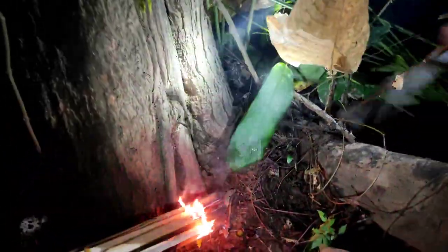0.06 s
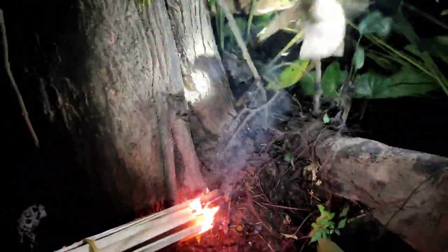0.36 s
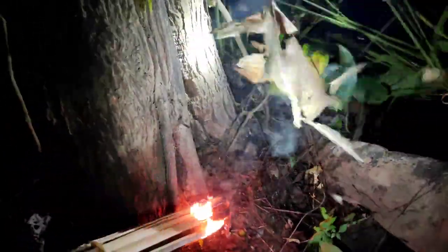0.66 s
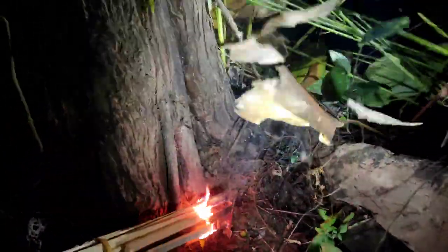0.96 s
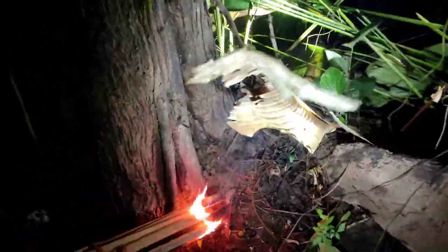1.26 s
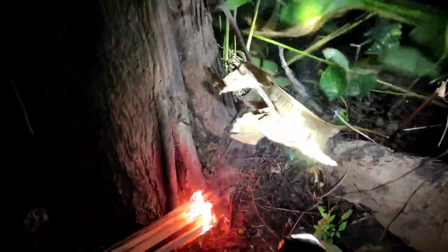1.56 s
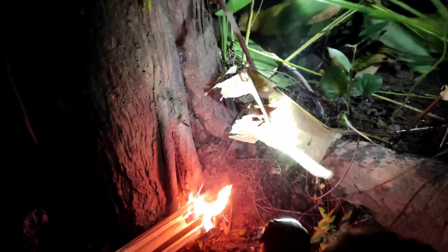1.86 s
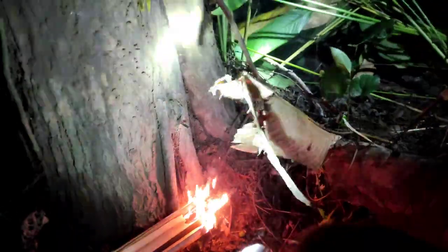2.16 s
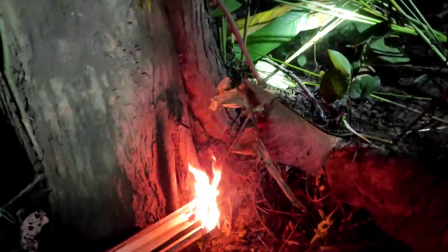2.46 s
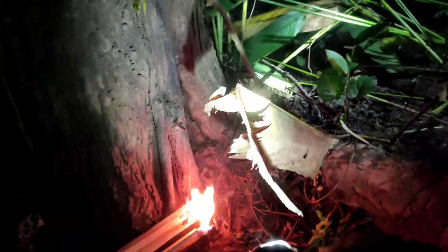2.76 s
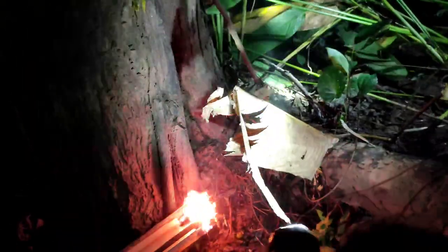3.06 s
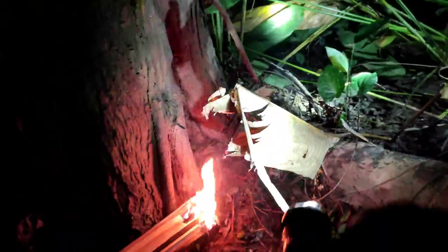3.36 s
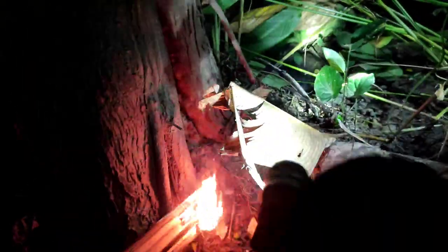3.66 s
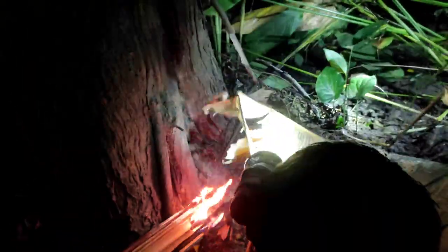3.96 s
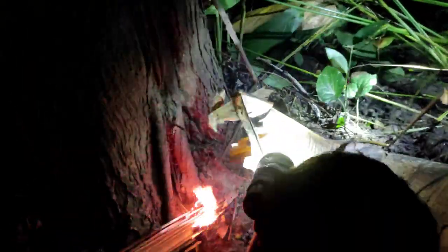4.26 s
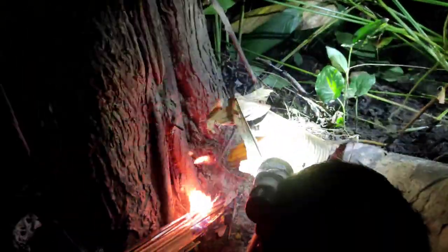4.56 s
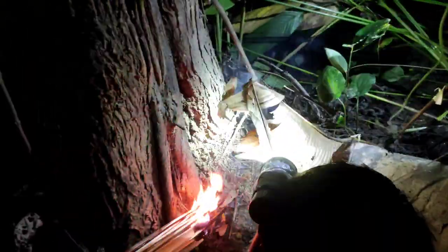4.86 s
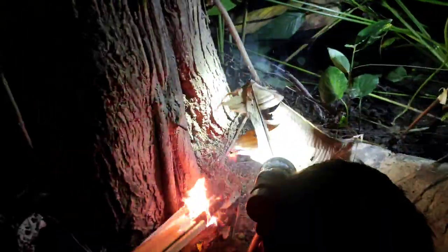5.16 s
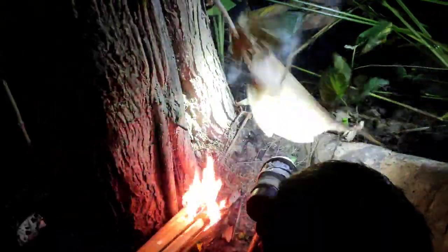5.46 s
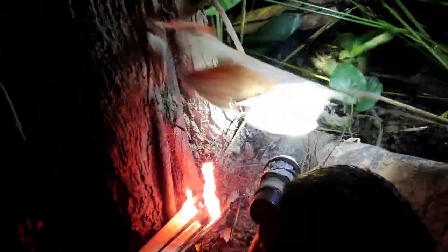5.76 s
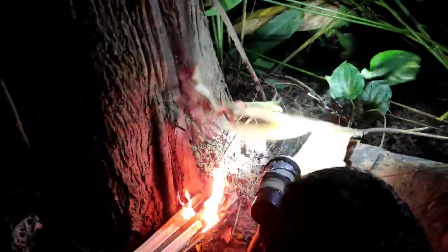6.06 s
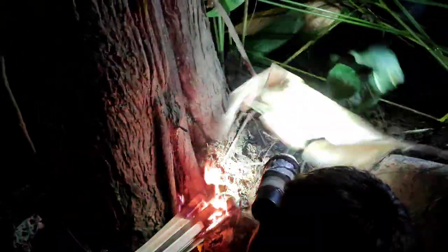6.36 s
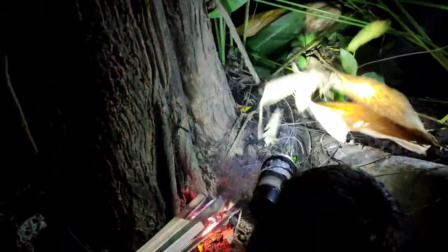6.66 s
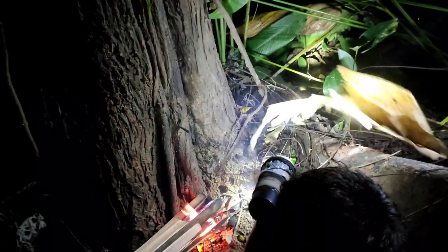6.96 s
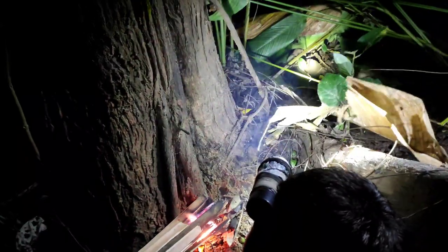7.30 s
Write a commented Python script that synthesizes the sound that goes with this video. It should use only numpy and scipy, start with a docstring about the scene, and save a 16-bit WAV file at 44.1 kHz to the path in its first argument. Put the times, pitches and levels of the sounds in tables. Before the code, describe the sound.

Close, irregular snaps and crunches of undergrowth being pulled, over leaf rustle, faint torch ticks and soft night insects.

```python
"""Dry cracks and rustling: leaves and stems are tugged, crushed and snapped in the undergrowth at night.
Each crack is an avalanche of tiny fibre fractures; the hardest also ring the modes of a hollow stem.
Each tug sets the leaves rustling until they settle, with dull thuds and rubbing in the litter.
A burning bamboo torch ticks faintly and a cricket pulses, over a distant insect chorus,
a brief faint hum and a low rumble of air."""
import sys
import numpy as np
from scipy import signal
from scipy.fft import rfft, irfft, next_fast_len
from scipy.io import wavfile

SR = 44100
rng = np.random.default_rng(int(sys.argv[2]) if len(sys.argv) > 2 else 0)


def dump(signal):
    """Clip the signal to [-1, 1] and save it as 16-bit WAV at the path in sys.argv[1]."""
    limited = np.clip(np.atleast_2d(signal).T, -1, 1)
    pcm = np.round(limited * 32767).astype(np.int16)
    wavfile.write(sys.argv[1], SR, pcm)


N = 327663
TIME = np.arange(N) / SR


# spectrum of dry leaf and fibre: (frequency [Hz], relative level [dB])
FIBRE_SPECTRUM = [(30, -1), (70, 2), (250, -1), (700, 0), (1200, -0.5), (1900, -2), (2800, -2), (4000, -6),
                  (5600, -10), (8000, -12.5), (10000, -15), (14000, -13)]
# how each material breaks: name -> (rise time [s], body gain [dB], treble gain [dB])
MATERIALS = {"twig": (0.0015, -13, -19.5), "stalk": (0.00085, -2, -3.5), "stem": (.003, 6.7, -0.95),
             "husk": (0.0057, 0.69, 6.2), "leaf": (0.011, 2.3, 12.6), "bamboo": (0.0014, -6, 19.7)}
# cracks and crunches: (time [s], level [dB], decay t60 [s], material)
CRACKS = [ (0.131, -48, 0.25, "stalk"), (.235, -42, 0.11, "stem"), (0.31, -24.5, 0.038, "twig"),
          (.318, -33.5, 0.71, "husk"), (.369, -24, 0.25, "stalk"), (.599, -34, 0.044, "twig"),
          (.687, -33, 0.2, "stem"), (.850, -41, 0.046, "stem"), (1.359, -47, 0.017, "stalk"),
          (1.531, -34.5, 0.76, "husk"), (1.559, -25.5, 0.5, "husk"), (1.572, -17.5, 0.27, "twig"),
          (1.596, -27.5, 0.59, "husk"), (1.910, -40.5, 0.029, "twig"), (1.971, -40, 0.055, "twig"),
          (2.212, -41, .068, "twig"), (2.339, -47.5, 0.07, "bamboo"), (2.720, -28.5, 0.26, "leaf"),
          (2.742, -23.5, 0.15, "leaf"), (2.807, -27.5, 0.069, "twig"), (3.123, -48.5, 0.034, "bamboo"),
          (3.225, -52, 0.051, "twig"), (3.278, -32.5, 0.031, "twig"), (3.325, -35, 0.35, "husk"),
          (3.332, -27, 0.049, "leaf"), (3.85, -29, .06, "twig"), (3.855, -14, 0.17, "stem"),
          (3.876, -14, 0.16, "stem"), (3.899, -26, 0.17, "husk"), (3.955, -30, 0.2, "stem"),
          (4.008, -30, 0.035, "twig"), (4.111, -29.5, 0.072, "twig"), (4.417, -29.5, .11, "stem"),
          (4.4308, -15, 0.16, "stem"), (4.456, -27, 0.29, "stalk"), (4.661, -35, 0.029, "twig"),
          (5.273, -41, 0.06, "husk"), (5.488, -43, 0.6, "stem"), (5.556, -40, 0.045, "bamboo"),
          (5.629, -36, 0.051, "bamboo"), (5.850, -29.5, .071, "stalk"), (5.898, -23.5, 0.075, "bamboo"),
          (5.953, -32, 0.1, "husk"), (6.104, -37, 0.12, "stem"), (6.409, -28, 0.33, "husk"),
          (6.427, -11.5, 0.062, "husk"), (6.441, -32, 0.13, "leaf"), (6.471, -26, 0.059, "stalk"),
          (7.007, -24, .16, "husk"), (7.023, -30.5, 0.12, "stalk"), (7.315, -47, 0.027, "twig")]
def cracks(splinter_db=-9):
    """Brittle fracture: fibres fail in an avalanche; thick stems add body, thin leaf adds treble."""
    out, t = np.zeros((2, N)), np.arange(SR // 2) / SR
    for start, db, t60, material in CRACKS:
        rise, body_db, treble_db = MATERIALS[material]
        swell = np.minimum(t / rise, 1) * decay(t, t60, hold=rise)
        tilt_db = lambda hz: body_db * (1 - shelf(hz, 1570)) + treble_db * shelf(hz, 3320)
        grains = fractures(len(t), spread_db=0.5)
        grains += undb(splinter_db) * splinters(len(t), count=260, spread_db=3.0)
        burst = colour(grains * swell, lambda hz: undb(along(FIBRE_SPECTRUM, hz) + tilt_db(hz)))
        add(out, unit(burst) * rms(swell) * undb(db), start)
    return out


def fractures(n, spread_db, size=24):
    """Acoustic emission: a dense run of half-millisecond noise snaps, each of random strength."""
    strength = undb(spread_db * np.minimum(rng.exponential(size=n // size + 1), 5))
    return unit(rng.standard_normal((2, n)) * np.repeat(strength, size)[:n])


def splinters(n, count, spread_db, low_hz=300, high_hz=3500, cycles=1.72, size=1024):
    """Damped free vibration: twigs and ribs each ring for a few cycles at a pitch of their own."""
    when, pitch, luck, *phases = rng.random((count, 5)).T[:, :, None]
    hz = low_hz + (high_hz - low_hz) * pitch ** 2
    strength = hz ** 1.08 * undb(spread_db * np.minimum(-np.log(1 - luck), 4))
    age = hz * np.arange(size) / SR  # in cycles
    envelope = np.exp(-age / cycles) * (1 - np.exp(-2 * age))
    rings = strength * np.sin(2 * np.pi * (age + np.array(phases))) * envelope
    where = ((when * n).astype(int) + np.arange(size)).ravel()
    return unit(np.array([np.bincount(where, ring.ravel(), n)[:n] for ring in rings]))


# modes of a hollow stem: (frequency [Hz], relative level [dB], decay t60 [s])
STEM_MODES = [(226, -25, 0.042), (520, -53, 0.063), (742, 5, 0.026), (980, 15, 0.0098), (1087, -5.5, 0.065),
              (1410, 5.5, 0.014)]
# blows on the stem: (time [s], peak level [dB], pitch ratio, delay of right channel [ms])
KNOCKS = [(3.8569, -12.5, 1.19, 0), (3.8580, -5.5, 1.08, 0), (3.8790, -8.5, 0.84, 0),
          (4.4304, -4.5, 0.98, 0.27), (4.4370, -3, 1.03, 0.22), (4.4591, -13, 0.94, 0),
          (6.4309, -13, 0.89, -0.11), (7.0087, -15, 1.17, -0.23), (7.0128, -11.5, 1.08, -0.29)]
def knocks(contact_s=0.00048):
    """Modal resonance: a blow rings the stem's damped modes, at a pitch set by where it lands."""
    out, t = np.zeros((2, N)), np.arange(SR // 8) / SR
    for start, db, ratio, lag_ms in KNOCKS:
        delay_s = np.maximum([[-lag_ms], [lag_ms]], 0) / 1000
        age = np.maximum(t - delay_s, 0)
        ring = sum(undb(mode_db) * np.sin(2 * np.pi * hz * ratio * age) * decay(age, t60)
                   for hz, mode_db, t60 in STEM_MODES)
        ring *= 1 - np.exp(-age / contact_s)  # the fibrous skin yields first
        add(out, ring / np.abs(ring).max() * undb(db), start)
    return out


# soft blows on soil and litter: (time [s], level [dB], centre frequency [Hz], decay t60 [s])
THUDS = [(.552, -39.5, 400, 0.09), (2.087, -45, 400, 0.089), (3.026, -47.5, 286, 0.18),
         (3.289, -36, 328, 0.047), (3.528, -44, 223, 0.061), (3.874, -24, 85, 0.12),
         (4.05, -35.5, 490, 0.099), (4.285, -40.5, 625, 0.079), (4.93, -33, 654, 0.077),
         (5.987, -37, 450, 0.055), (6.286, -48, 544, 0.044), (6.431, -21.5, 136, 0.054)]
def thuds(rise_s=0.0034):
    """Damped impact: something soft meets the ground in a short, dull band of noise."""
    out, t = np.zeros((2, N)), np.arange(SR // 4) / SR
    for start, db, centre_hz, t60 in THUDS:
        fade = np.minimum(t / rise_s, 1) * decay(t, t60)
        body = noise(len(t), lambda hz: shelf(hz, centre_hz) * (1 - shelf(hz, centre_hz)))
        add(out, unit(body * fade) * rms(fade) * undb(db), start)
    return out


# tugs at the foliage: (time [s], duration [s], level [dB], relative crinkle [dB], settling t60 [s])
TUGS = [(0.203, 0.3, -50, 1.5, 0.45), (0.47, 0.25, -41.5, -3.5, 1.08), (0.883, 0.23, -57.5, -0.5, 1.3),
        (1.613, .1, -39, -8, 0.62), (1.735, 0.07, -47.5, -6, 2.35), (2.06, 0.11, -62, 5.5, 3),
        (2.65, 0.26, -54.5, -1.5, .7), (3.189, 0.19, -51, 5.5, 0.64), (3.46, 0.48, -56, 0.5, 1),
        (3.72, .16, -53, -0.5, .5), (3.901, 0.15, -41, -4, 0.61), (4.154, .15, -55.5, -3, .8),
        (4.576, 0.53, -46.5, -3, 1.05), (5.03, 0.074, -48.5, -8, 0.37), (5.464, .31, -45.5, -1.5, 0.93),
        (5.773, 0.2, -43.5, 0.5, 1.8), (6.065, 0.31, -53, 0.5, 0.63), (6.462, 0.13, -42, 0, 0.81),
        (6.722, 0.34, -57.5, -4, 2.1), (7.047, 0.061, -45.5, -2.5, 0.97)]
def tugging(attack_s=0.06, stir_db=-61.5, stir_crinkle_db=-0.5):
    """Incoherent addition: tugs and a steady stir sum in power, giving the flex and crinkle gains."""
    flex_power, crinkle_power = undb(stir_db) ** 2, undb(stir_db + stir_crinkle_db) ** 2
    for start, length, db, crinkle_db, t60 in TUGS:
        pull = undb(db) * np.clip((TIME - start) / attack_s, 0, 1) * decay(TIME, t60, hold=start + length)
        flex_power += pull ** 2
        crinkle_power += (pull * undb(crinkle_db)) ** 2
    return np.sqrt(flex_power), np.sqrt(crinkle_power)


def rustle(twig_db=-8, rib_db=-13):
    """Superposed transients: dragged leaves flex in jerks, flick twigs, snap ribs and crinkle."""
    flex_gain, crinkle_gain = tugging()
    jerks_db = 1.57 * walk(70)
    twigs = splinters(N, count=4000, spread_db=2.8)
    ribs = splinters(N, count=170, spread_db=2.0, low_hz=700, high_hz=4500, cycles=3)
    grains = fractures(N, spread_db=-1.0) + undb(twig_db) * twigs + undb(rib_db) * ribs
    leaf = lambda hz: undb(along(FIBRE_SPECTRUM, hz))
    flex = unit(colour(grains, lambda hz: leaf(hz) * (1 - shelf(hz, 4000))))
    crinkle = unit(colour(fractures(N, spread_db=1.0), lambda hz: leaf(hz) * shelf(hz, 2120)))
    return (flex * flex_gain + crinkle * crinkle_gain) * undb(jerks_db)


# rubbing of the leaf litter, apart from the tugs: (time [s], level [dB])
LITTER_LEVELS = [(0, -64), (2.6, -69), (3.6, -60.5), (5.4, -65), (5.9, -55.5), (7.43, -50)]
def shuffle(drag_db=-11.5):
    """Friction noise: damp litter is pressed and shifted in a dull rub, stronger with every tug."""
    rub = noise(N, lambda hz: shelf(hz, 83) * (1 - shelf(hz, 440, order=2)))
    jerks_db = 2.4 * walk(25)
    pressed = undb(np.interp(TIME, *np.transpose(LITTER_LEVELS)))
    dragged = undb(drag_db) * tugging()[0]
    return rub * np.hypot(pressed, dragged) * undb(jerks_db)


def thicket(sound, t60=0.2, build_s=0.019, wet_db=-15):
    """Multiple scattering: trunks and foliage return a short, thin tail."""
    t = np.arange(SR // 2) / SR
    echoes = rng.standard_normal((2, len(t))) * decay(t, t60) * np.minimum(t / build_s, 1)
    echoes = colour(echoes, lambda hz: 1 - .5 * shelf(hz, 3200))
    return signal.fftconvolve(sound, unit(echoes) / np.sqrt(len(t)), axes=1)[:, :N] * undb(wet_db)


def flame(count=36, decay_s=.003):
    """Random impulses: burning bamboo gives off small, lone ticks."""
    ticks, t = np.zeros((2, N)), np.arange(SR // 30) / SR
    for when, strength in rng.random((count, 2)):
        tick = rng.standard_normal((2, len(t))) * np.exp(-t / decay_s)
        add(ticks, tick * undb(-65 + 9 * strength ** 2), when * N / SR)
    return colour(ticks, lambda hz: shelf(hz, 1500, order=2))


def cricket(note_hz=3204, pulse_hz=12.4, first_s=.026, duty=.72, fade_from_s=4.4, fade_db_per_s=5):
    """Stridulation: one cricket's wings sing a pure note in nearly even pulses, fading late on."""
    stroke = (pulse_hz * (TIME - first_s) + 0.05 * walk(8)) % 1
    pulse = np.abs(np.sin(np.pi * np.minimum(stroke / duty, 1))) ** 0.83
    pitch = note_hz + 25 * (duty / 2 - stroke) + 9 * walk(60)  # the note sags as the wings slow
    level_db = -54.5 - fade_db_per_s * np.maximum(TIME - fade_from_s, 0)
    waver_db = 2.2 * np.array([walk(25), walk(9)])
    return pulse * sine(pitch) * undb(level_db + waver_db)


# far insects: (frequency [Hz], level [dB])
INSECTS = [(3930, -63), (4030, -64.5), (4130, -64), (4230, -63), (4310, -73)]
def chorus(waver_hz=34, flutter_db=3.5):
    """Decorrelation: far insects trill on close notes that reach each microphone by different paths."""
    def trill(hz):
        pitch = hz + waver_hz * (walk(6.4) + .7 * walk(150))
        return sine(pitch) * undb(flutter_db * walk(35))
    return sum(undb(db) * np.array([trill(hz), trill(hz)]) for hz, db in INSECTS)


def hum(hum_hz=366, level_db=-61):
    """Exponential decay: a faint, low tone holds briefly at the start, then dies away."""
    return sine(hum_hz + 3 * walk(12)) * undb(level_db) * decay(TIME, t60=0.61, hold=0.34)


# spectrum of still night air: (frequency [Hz], relative level [dB])
AIR_SPECTRUM = [(15, 5), (30, 0), (70, -10), (150, -17.5), (500, -29), (1500, -31.5), (5000, -30),
                (14000, -50)]
def air(level_db=-50.5):
    """Ambient noise: a low rumble and a faint hiss swell slowly together."""
    return noise(N, lambda hz: undb(along(AIR_SPECTRUM, hz))) * undb(level_db + 2.2 * walk(5.2))


# likeness of the two microphones' signals: (frequency [Hz], correlation)
COHERENCE = [(30, 0.024), (110, 0.91), (300, 0.9), (600, 0.68), (1100, 0.23), (1800, 0), (14000, 0.036)]
def colour(pair, gain):
    """Spatial coherence: two unrelated signals, filtered by gain(Hz), grow alike in the upper bass."""
    n = pair.shape[1]
    size = next_fast_len(n + 2048)
    hz = np.arange(size // 2 + 1) * SR / size
    mid, side = rfft(pair, size) * gain(hz)
    alike = along(COHERENCE, hz)
    mid, side = mid * np.sqrt(1 + alike), side * np.sqrt(1 - alike)
    return irfft(np.array([mid + side, mid - side]), size)[:, :n]


def noise(n, gain):
    """Spectral shaping: stereo noise filtered by gain(Hz), at rms 1."""
    return unit(colour(rng.standard_normal((2, n)), gain))


def sine(hz):
    """Phase is the integral of frequency: a tone that follows hz."""
    return np.sin(2 * np.pi * np.cumsum(hz) / SR)


def decay(t, t60, hold=0):
    """Exponential decay: gain 1 until time hold, then 60 dB down every t60 seconds."""
    return np.exp(-np.log(1000) * np.maximum(t - hold, 0) / t60)


def walk(rate):
    """Random modulation: rate values a second, joined by straight lines, spread near 1."""
    levels = rng.standard_normal(4096)
    return np.interp(TIME * rate, np.arange(len(levels)), levels)


def shelf(hz, corner_hz, order=4):
    """High-pass response: a smooth step from 0 below the corner to 1 above it."""
    return 1 - 1 / (1 + (hz / corner_hz) ** order)


def along(points, hz):
    """Interpolation of (Hz, value) points on a log-frequency axis."""
    f, value = np.transpose(points)
    return np.interp(np.log(hz + 1), np.log(f), value)


def undb(db):
    """Decibels to amplitude ratio."""
    return 10 ** (np.asarray(db) / 20)


def rms(x):
    """Root-mean-square amplitude."""
    return np.sqrt(np.mean(x ** 2))


def unit(x):
    """Normalisation to rms 1."""
    return x / rms(x)


def add(out, sound, start_s):
    """Superposition: mix a sound in at start_s."""
    start = int(start_s * SR)
    out[:, start:start + sound.shape[1]] += sound[:, :N - start]


def scene():
    """Linear superposition: near cracks and their scatter, over leaves, flame and the night."""
    near = cracks() + knocks() + thuds()
    return near + thicket(near) + rustle() + shuffle() + flame() + cricket() + chorus() + hum() + air()


# imbalance of the two microphone ports: (frequency [Hz], left minus right [dB])
PORT_BALANCE = [(500, 0), (1300, 1), (2300, -2.5), (3300, -3.5), (5000, -0.5), (7500, 9), (13000, 0)]
def record(dry, ceiling_db=-1.5, top_hz=14250):
    """Transducer response: each port colours the sound, peaks saturate softly and the top is cut."""
    size = next_fast_len(N + 2048)
    lean_db = along(PORT_BALANCE, np.arange(size // 2 + 1) * SR / size) / 2
    heard = irfft(rfft(dry, size) * undb([lean_db, -lean_db]), size)[:, :N]
    rounded = heard / (1 + (heard / undb(ceiling_db)) ** 4) ** .25
    return signal.sosfilt(signal.ellip(10, .2, 80, top_hz, fs=SR, output="sos"), rounded)


dry = scene()
out = record(dry)
dump(out)
```